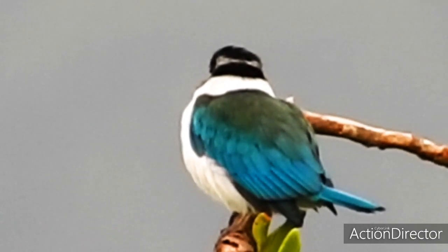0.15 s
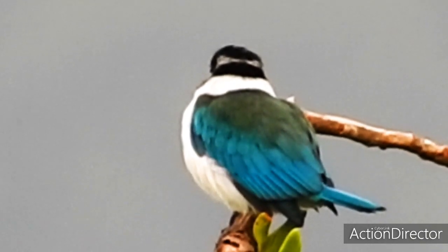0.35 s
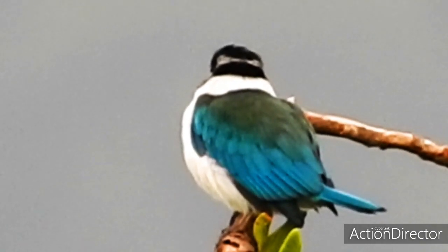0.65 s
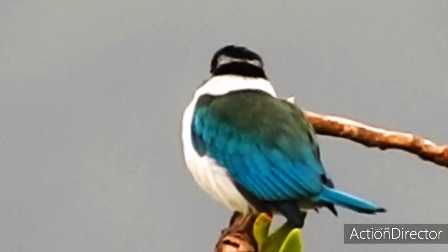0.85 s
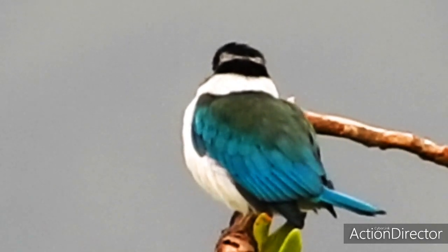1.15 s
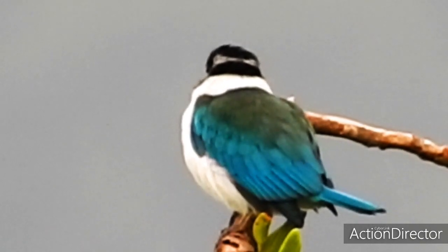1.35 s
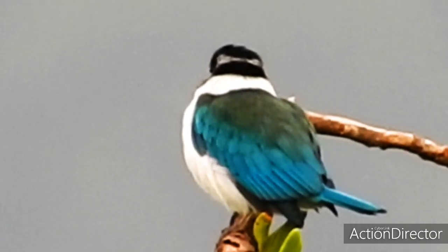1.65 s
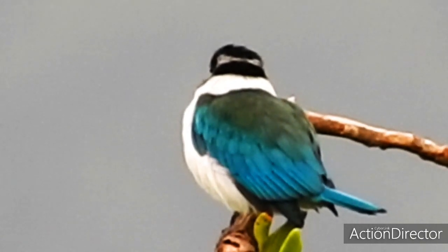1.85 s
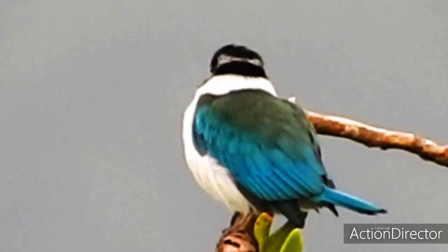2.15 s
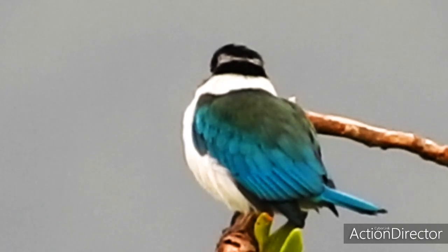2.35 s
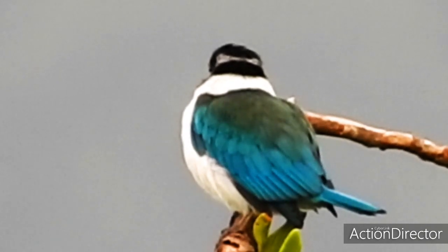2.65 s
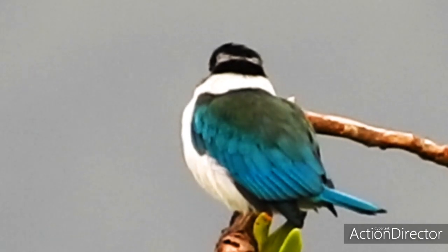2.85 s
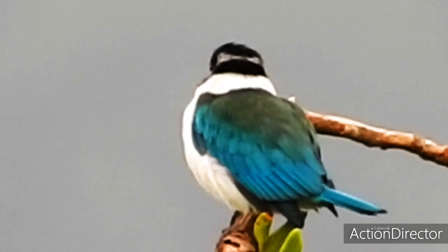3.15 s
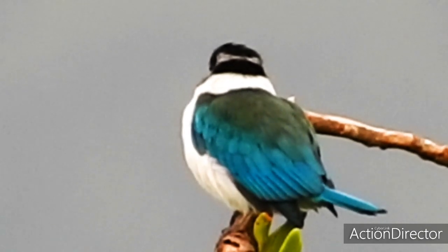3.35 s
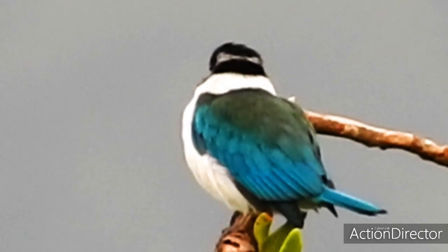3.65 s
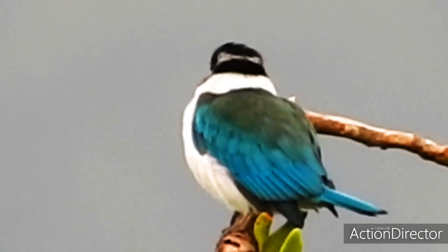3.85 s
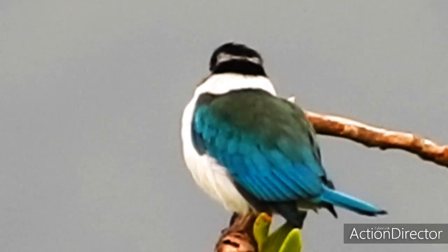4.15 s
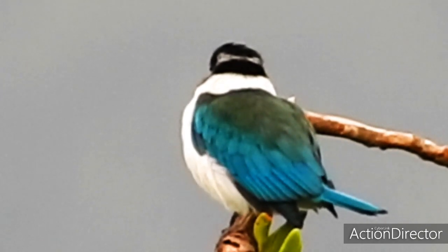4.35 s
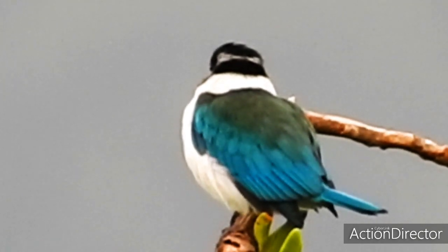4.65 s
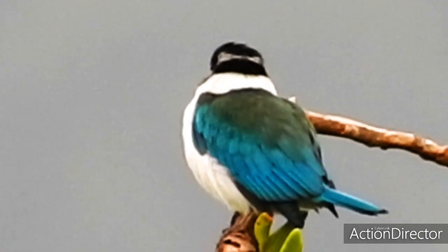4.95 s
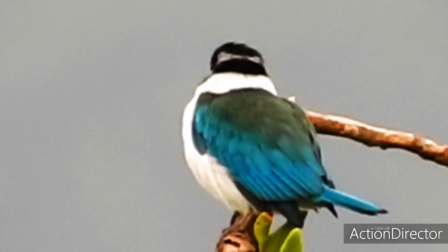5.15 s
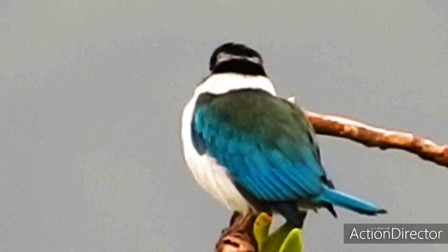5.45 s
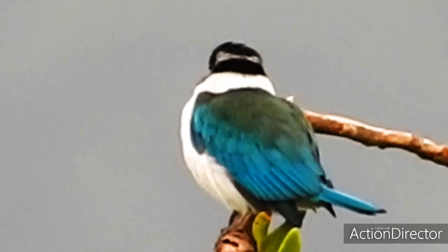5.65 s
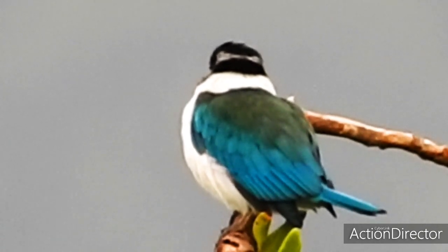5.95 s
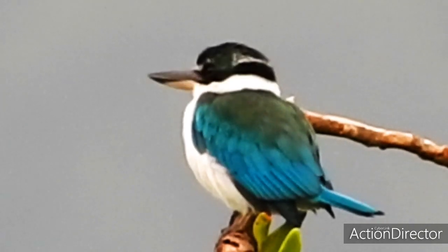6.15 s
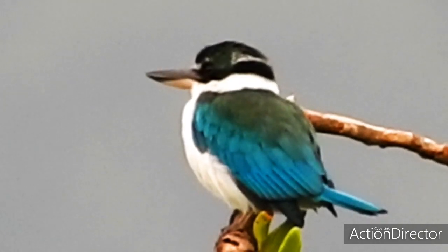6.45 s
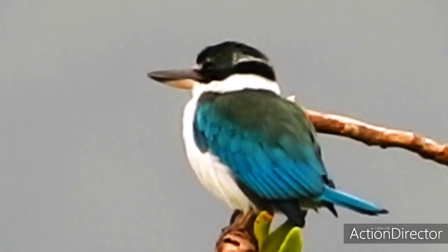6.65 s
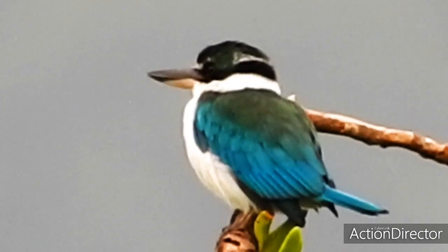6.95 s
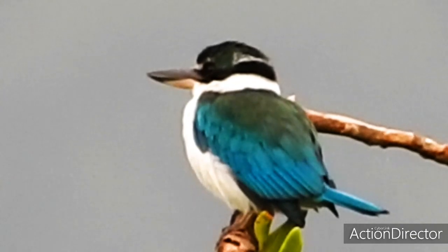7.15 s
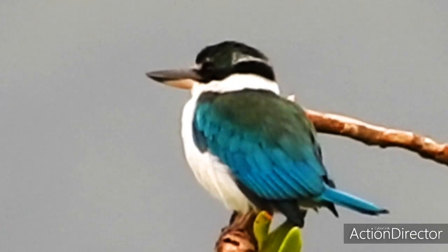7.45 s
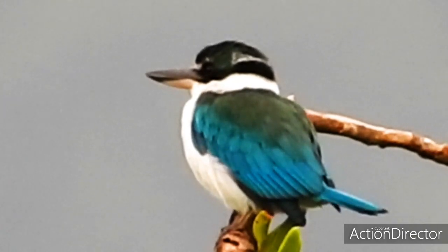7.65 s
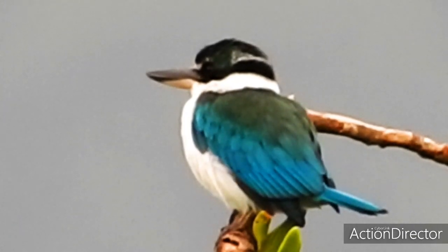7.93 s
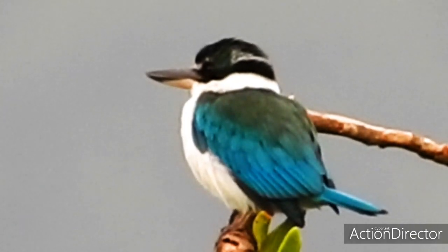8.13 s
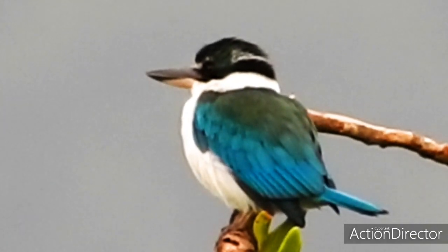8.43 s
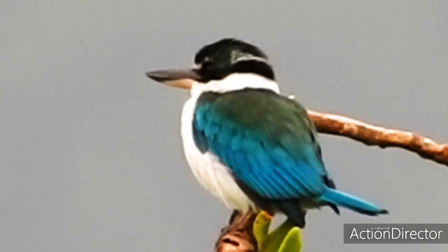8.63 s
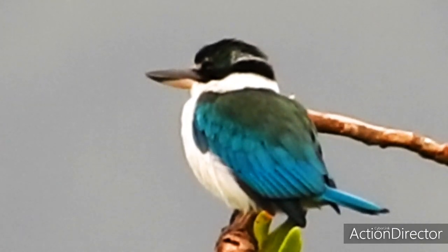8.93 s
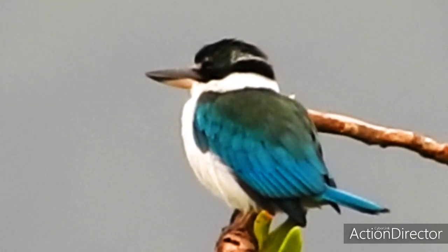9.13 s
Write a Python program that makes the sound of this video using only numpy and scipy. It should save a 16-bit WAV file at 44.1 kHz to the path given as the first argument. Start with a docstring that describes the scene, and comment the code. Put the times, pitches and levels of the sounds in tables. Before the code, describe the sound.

A kingfisher scolds in bouts of quick, harsh, squeaky calls over a steady outdoor hiss and low drone.

```python
"""A kingfisher scolds in bouts of quick, harsh calls, with one clear whistle near the end.
Each call runs squeak, arch, squeak, arch around 3 kHz as the two sides of the syrinx take turns;
strain adds rasp and overtones. Trees throw the calls back over a low outdoor drone, a steady hiss
and a far rush that swells late on. A fast limiter flattens the loudest notes."""
import sys
import numpy as np
from scipy import signal
from scipy.fft import rfft, irfft
from scipy.io import wavfile
from scipy.ndimage import uniform_filter1d, minimum_filter1d

SR = 44100
rng = np.random.default_rng(int(sys.argv[2]) if len(sys.argv) > 2 else 0)


def unload_wav(signal):
    """Save mono or channel-first audio to the path in sys.argv[1] as 16-bit WAV at rate SR, clipped to [-1, 1]."""
    wavfile.write(
        sys.argv[1],
        SR,
        np.round(np.clip(np.atleast_2d(signal).T, -1, 1) * 32767).astype(np.int16),
    )


N = 409688

# the bird's calls: start_s, length_s, pitch_hz, arch_level_db, middle_squeak_level_db
CALLS = [(.013, .064, 3270, -4, -9), (.262, 0.066, 3270, -5.5, -9.5), (0.414, 0.064, 3256, -4.5, -6),
         (0.555, 0.066, 3278, -4, -16), (0.826, 0.063, 3253, -5.5, -8.5), (0.971, .063, 3270, -6.5, -11.5),
         (1.263, 0.065, 3226, -4.5, -10.5), (1.413, 0.063, 3270, -5, -12), (1.869, .063, 3294, -5.5, -8),
         (1.997, 0.066, 3275, -10.5, -6.5), (2.132, 0.064, 3306, -8, -7.5), (2.266, 0.065, 3370, -7, -7),
         (2.408, 0.064, 3348, -3.5, -8.5), (2.555, .062, 3304, -7, -8), (2.694, 0.067, 3290, -10, -1.5),
         (2.828, 0.064, 3270, -10, -6), (2.981, 0.073, 3266, -8.5, -5), (3.135, 0.063, 3210, -5, -12.5),
         (3.296, 0.068, 3280, -7, -10), (3.444, 0.067, 3276, -7, -9.5), (3.604, .064, 3243, -6.5, -12),
         (3.761, 0.066, 3212, -7, -8), (4.016, 0.069, 3200, -8, -3.5), (4.166, .066, 3193, -9, -2),
         (4.321, .067, 3230, -7.5, -9), (5.747, .063, 3370, -10, -1), (5.878, .064, 3400, -8.5, -8),
         (6.026, 0.062, 3420, -7.5, -3), (6.168, .068, 3310, -7.5, -2), (6.314, 0.067, 3336, -13, -0.5),
         (6.465, 0.069, 3264, -8.5, -5), (6.604, 0.065, 3370, -7, -9), (6.756, .068, 3340, -8.5, -3.5),
         (7.039, 0.067, 3290, -6.5, -5), (7.193, 0.068, 3230, -7, -7), (7.461, 0.069, 3240, -6.5, -6.5),
         (7.608, 0.066, 3317, -7.5, -6), (7.86, .069, 3310, -7, -6.5), (8.004, 0.068, 3226, -8, -6.5),
         (8.329, 0.066, 3313, -4.5, -9.5), (8.468, .068, 3180, -7.5, -8.5),
         (9.074, .069, 3410, -11.5, -10.5), (9.22, 0.067, 3377, -7, -12)]
# voice and posture, held through a bout: onset_s, second_arch_boost_db, arch_bend, squeak_roughness,
# octave_db, undertone_over_rasp_db, left_lead_ms, left_over_right_db, scattered_share
BOUTS = [(0, -.5, 1.03, .9, -39, -2, -0.022, 1.2, 0.1), (1.895, 2.5, 1.01, 1.76, -33, 3, -0.055, 0.2, 0.32),
         (2.96, 2, 1.1, 1.7, -31.5, 6, 0.063, 0, 0.27), (5.745, 0, 1.35, 1.17, -30.5, 0, -0.03, .2, 0.19),
         (7, -0.5, 1.32, 1.09, -26.5, 12, 0.02, .5, 0.24)]
# vocal strain, highest as a long run begins, then easing: time_s, strain_db
STRAIN = [(0, 0), (1.45, -2.5), (2, 6), (2.4, 6), (2.8, 0), (3.4, 1.5), (3.75, -2), (4.35, -2.5), (5.75, 9),
          (6.3, 5.5), (6.8, 1.5), (7.15, -2.5), (7.9, .5), (9.25, .5)]
# note contours (an arch slides in before 0 and out after 1): length_share, pitch_ratio, level_db
OPENING_SQUEAK = [(0, 1.158, -29), (.25, 1.12, -11), (.45, 1.05, -8), (.62, .98, 1.5), (.78, 1.0, -0.5),
                  (.92, 1.147, 0.5), (1, 1.2, -14)]
ARCH = [(-.2, .72, -23), (-.07, .88, -13), (0.071, .98, -1.5), (.24, 1.008, -2), (.5, .998, -1.5),
        (.76, .972, -1), (.93, .938, -1.5), (1.12, 0.886, -10.5), (1.35, 0.9, -22)]
MIDDLE_SQUEAK = [(0, 1.27, -14), (.2, 1.14, -17), (.4, 1.01, -2), (.6, .98, -1), (.78, 1.04, -.5),
                 (.9, 1.153, -9.5), (1, 1.34, -16)]
UNDERTONE = [(0, 1.2, 6), (.3, 1.0, -2.5), (.7, .98, -2.5), (1, 1.19, -11)]
# how beak and throat pass the overtones: frequency_hz, gain_db
BEAK_EQ = [(4500, -9), (5600, -3), (6500, 1.5), (7300, -9), (8600, -10), (9300, -8.5), (9750, -2.5),
           (10400, -12.5), (11800, -7), (12900, -3)]
# colour of the calls' rasp and the whistle's scratch: frequency_hz, gain_db
RASP_EQ = [(900, -11), (1700, -14.5), (2250, 1), (3000, -22), (4300, 5), (5300, 3), (6500, 6), (7600, -6.5),
           (8600, 0), (9700, 4), (11000, -4.5), (12000, 1), (13000, -3)]
SCRATCH_EQ = [(2000, -22), (4000, -10), (8000, -4), (10000, 5), (13000, -8)]
# the whistle's two swells: time_s, level_db
WHISTLE_SWELLS = [(8.912, -17), (8.918, -8), (8.928, -5), (8.94, -17), (8.95, -5), (8.98, -4), (8.993, -14)]
# decay of the foliage tail: frequency_hz, t60_s
FOLIAGE_DECAY = [(1000, 0.23), (3200, 0.51), (6000, 0.77), (12000, 0.26)]
# distinct echoes off the trees: delay_s, level_db
TREE_ECHOES = [(.021, -16.5), (0.046, -23.5), (.066, -24.5), (.1, -28.5), (.108, -26), (.175, -27.5)]
# colour of the three outdoor beds: frequency_hz, gain_db
DRONE_EQ = [(20, -30), (40, -20), (60, -6), (85, 3.5), (105, -0.5), (125, -8), (180, 1.5), (300, -5),
            (430, -3), (560, -5.5), (660, -4.5), (850, -9), (1500, -9.5), (3000, -19), (6000, -46)]
HISS_EQ = [(700, -9.5), (1500, -12.5), (2500, -4.5), (3400, -2.5), (3950, -8), (4300, -2), (5400, -0.5),
           (6400, 3), (7100, -2), (7800, -9.5), (10000, -21.5), (13000, -29)]
RUSH_EQ = [(500, -31), (1000, 3), (1400, -1), (2000, 3), (2700, -5.5), (4000, -22.5)]
# the far rush's swell: time_s, level_db
RUSH_SWELL = [(0, -39.5), (1.8, -43), (3.5, -42), (5.2, -42), (6.5, -40), (6.9, -34), (8, -32.5),
              (9.3, -33.5)]
# how alike the beds are at the two ears: frequency_hz, correlation
EAR_LIKENESS = [(25, 0.56), (70, 0.99), (300, 0.99), (700, 0.93), (1400, 0.84), (3000, .7), (6000, 0.1),
                (12000, 0.059)]

# every call keeps this rhythm, counted from the start of its first arch
OPENING_SPAN_S, FIRST_ARCH_END_S = (-.0205, -.0013), .0245  # the voice catches just before 0
MIDDLE_SPAN_S, SECOND_ARCH_START_S = (.0235, .044), .0475
UNDERTONE_HZ, UNDERTONE_DELAY_S = 2250, .00598


def scold_call(start_s, length_s, pitch_hz, level_db, middle_db):
    """The two sides of the syrinx trade squeaks and arches; strain adds rasp and overtones."""
    bout = [row for row in BOUTS if row[0] < start_s + length_s][-1]
    onset_s, boost_db, bend, squeak_rough, octave_db, under_db, *posture = bout
    t = np.arange(-.03, length_s + .035, 1 / SR)
    strain_db = np.interp(start_s, *np.transpose(STRAIN))
    rasp_db = -30 + strain_db
    opening_db = -10.5 + .63 * middle_db + .27 * strain_db
    opening_hz = 3800 * gain_of(.1 * strain_db)
    middle_hz = 1.055 * pitch_hz + 12 * strain_db
    arch_rough = .42 * gain_of(.8 * strain_db)
    squeak_strain = gain_of(.35 * strain_db)
    overtones_db = np.array([octave_db + 1.2 * strain_db, rasp_db + 9, rasp_db - 3]) - level_db
    # on_s, off_s, contour, pitch_hz, level_db, roughness, overtones_db
    notes = [
        (*OPENING_SPAN_S, OPENING_SQUEAK, opening_hz, opening_db,
         2.19 * squeak_strain, overtones_db - 2),
        (0, FIRST_ARCH_END_S, arch(bend), pitch_hz, level_db + 1, arch_rough, overtones_db),
        (*MIDDLE_SPAN_S, MIDDLE_SQUEAK, middle_hz, middle_db + .4,
         squeak_rough * squeak_strain, overtones_db + 1),
        (SECOND_ARCH_START_S, length_s, arch(bend), .98 * pitch_hz, level_db + 1 + boost_db,
         arch_rough, overtones_db - boost_db)]
    # the low side of the syrinx buzzes under each squeak
    for on, off, squeak_db in [(OPENING_SPAN_S[0], 0, opening_db), (*MIDDLE_SPAN_S, middle_db)]:
        buzz_db = min(rasp_db + under_db, squeak_db - 13)
        notes.append((on + UNDERTONE_DELAY_S, off, UNDERTONE, UNDERTONE_HZ, buzz_db, 1.34, []))
    # a bout may set in part-way through its first call
    voice = sum(syrinx_note(t, on, off, *rest) for on, off, *rest in notes
                if start_s + (on + off) / 2 > onset_s)
    return start_s + t[0], to_ears(voice + rasp(voice, rasp_db + 7), *posture)


def arch(bend):
    """The arched pitch contour, bent to a slightly different depth each time."""
    depth = bend * np.exp(.12 * rng.standard_normal())
    return [(share, ratio ** depth, db) for share, ratio, db in ARCH]


def syrinx_note(t, on_s, off_s, contour, pitch_hz, level_db, roughness, overtones_db):
    """One gliding tone of the syrinx; roughness shakes its pitch and its strength."""
    share, ratio, contour_db = np.transpose(contour)
    progress = (t - on_s) / (off_s - on_s)
    glide_hz = pitch_hz * np.interp(progress, share, ratio)
    jitter = .0339 * flutter(len(t), hz=950) + .01304 * flutter(len(t), hz=300)
    phase = 2 * np.pi * np.cumsum(glide_hz * (1 + roughness * jitter)) / SR
    fade = np.clip(np.minimum(progress - share[0], share[-1] - progress) * 25, 0, 1)
    swell = gain_of(np.interp(progress, share, contour_db)) * fade
    depth = .3 * roughness
    shimmer = (1 + depth * flutter(len(t), hz=950)) / np.sqrt(1 + depth ** 2)
    # the tone brightens as it swells
    overtones = swell * sum(gain_of(db + curve_at(BEAK_EQ, k * glide_hz)) * np.sin(k * phase)
                            for k, db in enumerate(overtones_db, 2))
    return np.sqrt(2) * gain_of(level_db) * swell * shimmer * (np.sin(phase) + overtones)


def rasp(voice, level_db, smoothing_s=.001):
    """Noise flows in quick, irregular puffs while the voice sounds and dies just after it."""
    flow = signal.lfilter([1], [1, -np.exp(-1 / (smoothing_s * SR))], voice ** 2) ** .12
    puffs = unit_rms(np.exp(.19 * flutter(len(voice), hz=400))) * flow / flow.max()
    return gain_of(level_db) * puffs * coloured(rng.standard_normal(len(voice)), RASP_EQ)


def whistle(from_hz=4270, to_hz=3370, fall_s=.025, fade_s=.004, octave_decay_s=.046):
    """A clear note that falls and levels out, with a fading octave and a faint scratch."""
    times_s, swell_db = np.transpose(WHISTLE_SWELLS)
    start_s, length_s = times_s[0], times_s[-1] - times_s[0]
    t = np.arange(0, length_s + .03, 1 / SR)
    glide_hz = to_hz + (from_hz - to_hz) * np.exp(-(t / fall_s) ** 1.54)
    phase = 2 * np.pi * np.cumsum(glide_hz * (1 + .016 * flutter(len(t), hz=400))) / SR
    fade = np.clip(np.minimum(t, length_s - t) / fade_s, 0, 1)
    swell = gain_of(np.interp(start_s + t, times_s, swell_db)) * fade
    tone = np.sin(phase) + gain_of(-25) * np.exp(-t / octave_decay_s) * np.sin(2 * phase)
    scratch = gain_of(-29) * swell ** .081 * coloured(rng.standard_normal(len(t)), SCRATCH_EQ)
    voice = np.sqrt(2) * swell * tone + scratch
    return start_s, to_ears(voice, lead_ms=-.0095, pan_db=0, scattered=.043)


def to_ears(x, lead_ms, pan_db, scattered, spread_s=.0025, reflections=10):
    """The direct sound reaches one ear first; nearby leaves give each ear its own short reflections."""
    hz = np.fft.rfftfreq(len(x), 1 / SR)
    side = np.array([[.5], [-.5]])
    delays_s = rng.exponential(spread_s, (2, reflections, 1))
    polarity = rng.choice([-1, 1], delays_s.shape)
    leaves = (polarity * np.exp(-2j * np.pi * hz * delays_s)).sum(1) / np.sqrt(reflections)
    wet = np.clip(scattered + .12 * np.log2(1 + (hz / 7000) ** 4), 0, .75)  # treble scatters more
    direct = np.exp(2j * np.pi * hz * side * lead_ms / 1000)
    ears = irfft(rfft(x) * (np.sqrt(1 - wet) * direct + np.sqrt(wet) * leaves), len(x))
    return ears / ears.std(1, keepdims=True) * x.std() * gain_of(side * pan_db)


def trees(x, tail_db=-15.5, crossfeed=.12, taps_per_s=3000, build_s=.021):
    """The trees return a diffuse foliage tail and a few distinct echoes."""
    taps = rng.standard_normal((2, SR)) * (rng.random((2, SR)) < taps_per_s / SR)
    hz, t, bands = signal.stft(taps + crossfeed * taps[::-1], SR, nperseg=256)
    decay = gain_of(-60 * t / curve_at(FOLIAGE_DECAY, hz)[:, None])
    tail = signal.istft(bands * decay * np.minimum(t / build_s, 1), SR, nperseg=256)[1]
    tail *= gain_of(tail_db) / np.linalg.norm(tail[0])
    for delay_s, db in TREE_ECHOES:
        tail[[0, 1], round(delay_s * SR) + rng.integers(0, 30, 2)] += gain_of(db)
    return signal.fftconvolve(x, tail, axes=1)[:, :N]


def far_rush():
    """A distant midrange rush that swells over the last few seconds."""
    swell_db = np.interp(np.arange(N) / SR, *np.transpose(RUSH_SWELL))
    return gain_of(swell_db) * air_bed(RUSH_EQ, waver_db=1.2)


def air_bed(eq, waver_db, ripple_db=1.45, patch_db=3):
    """Outdoor noise, centred in the bass; reflections ripple its spectrum and patches of it drift."""
    left, independent = rfft(rng.standard_normal((2, N)))
    likeness = np.clip(curve_at(EAR_LIKENESS, np.fft.rfftfreq(N, 1 / SR)), 0, 1)
    right = likeness * left + np.sqrt(1 - likeness ** 2) * independent
    hz, _, bands = signal.stft(irfft(np.array([left, right]), N), SR, nperseg=1024, noverlap=768)
    ripple = unit_rms(uniform_filter1d(rng.standard_normal(len(hz)), size=2))[:, None]
    drift = uniform_filter1d(rng.standard_normal(bands.shape[1:]), size=16, axis=1)
    patches = unit_rms(uniform_filter1d(drift, size=3, axis=0))
    bands *= gain_of((ripple_db * ripple + patch_db * patches) * np.minimum(hz[:, None] / 700, 1))
    bed = signal.istft(bands, SR, nperseg=1024, noverlap=768)[1][:, :N]
    return coloured(bed, eq) * gain_of(waver_db * flutter(N, hz=28))


def gain_of(db):
    """Decibels to amplitude."""
    return 10 ** (np.asarray(db) / 20)


def unit_rms(x):
    """Scales to rms 1."""
    return x / np.sqrt(np.mean(x ** 2) + 1e-20)


def curve_at(points, hz):
    """Reads a table on a log-frequency axis."""
    points_hz, values = np.transpose(points)
    return np.interp(np.log(hz + 1), np.log(points_hz + 1), values)


def coloured(x, eq):
    """Runs x through an EQ curve and scales it to rms 1."""
    size = x.shape[-1]
    gain = gain_of(curve_at(eq, np.fft.rfftfreq(size, 1 / SR)))
    return unit_rms(irfft(rfft(x) * gain, size))


def flutter(size, hz):
    """Random wavering up to about hz, at rms 1."""
    rolloff = 1 + (np.fft.rfftfreq(size, 1 / SR) / hz) ** 4
    return unit_rms(irfft(rfft(rng.standard_normal(size)) / rolloff, size))


def add(mix, start_s, sound):
    """Mixes in a stereo sound, trimmed to fit."""
    at = round(start_s * SR)
    sound = sound[:, max(-at, 0):]
    part = mix[:, max(at, 0):][:, :sound.shape[1]]
    part += sound[:, :part.shape[1]]


def scene():
    """The kingfisher among trees, over drone, hiss and a far rush."""
    bird = np.zeros((2, N))
    for row in CALLS:
        add(bird, *scold_call(*row))
    add(bird, *whistle())
    drone = gain_of(-31) * air_bed(DRONE_EQ, waver_db=.5)
    hiss = gain_of(-29.5) * air_bed(HISS_EQ, waver_db=.24)
    rush = far_rush()
    return bird + trees(bird) + drone + hiss + rush


def record(dry, ceiling=.93, cutoff_hz=13150):
    """A fast limiter flattens the loudest notes; a steep low-pass trims the top."""
    envelope = abs(signal.hilbert(dry, axis=1))
    gain = minimum_filter1d(np.minimum(1, ceiling / (envelope + 1e-9)), size=21, axis=1)
    limited = dry * uniform_filter1d(gain, size=21, axis=1)
    lowpass = signal.firwin(511, cutoff_hz, window=("kaiser", 9), fs=SR)
    return signal.oaconvolve(limited, lowpass[None], "same")


dry = scene()
out = record(dry)
unload_wav(out)
```